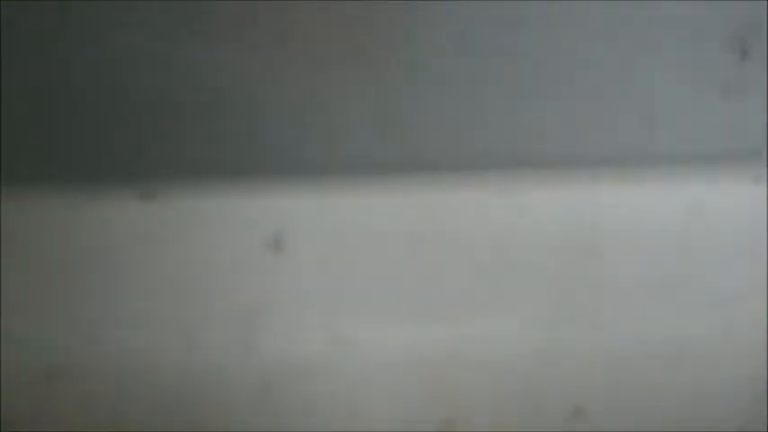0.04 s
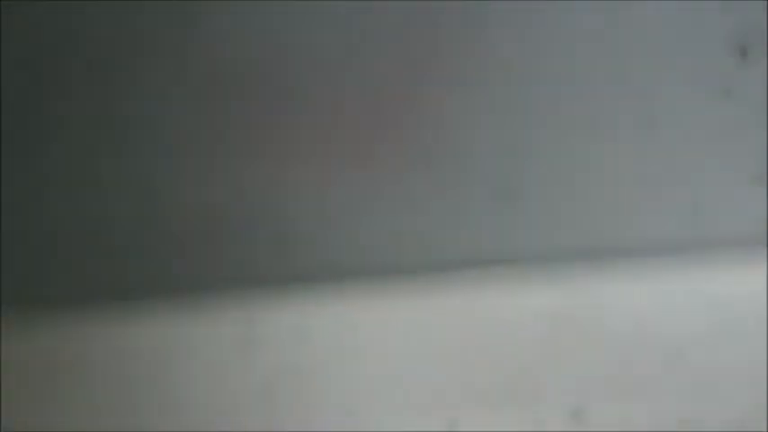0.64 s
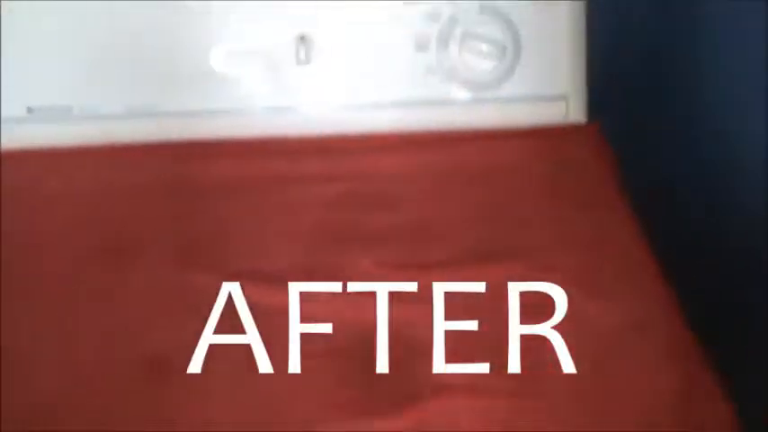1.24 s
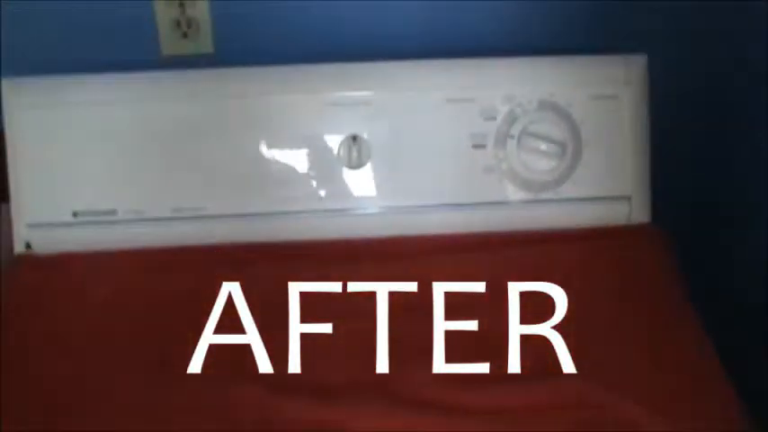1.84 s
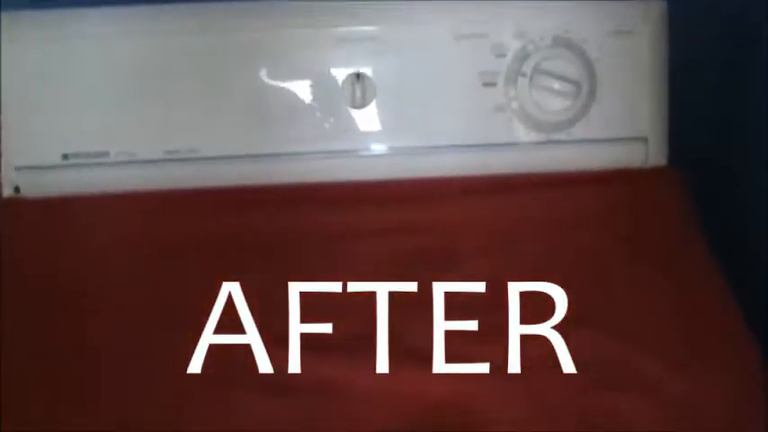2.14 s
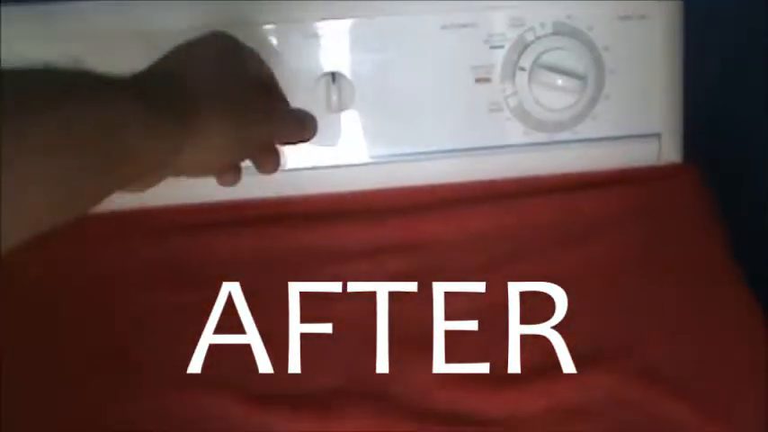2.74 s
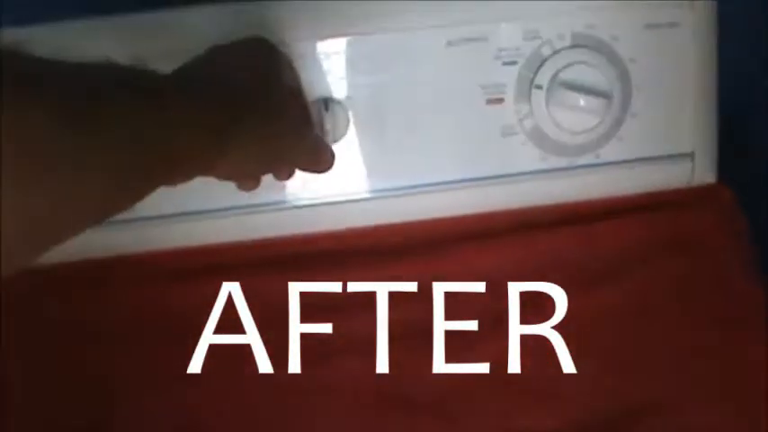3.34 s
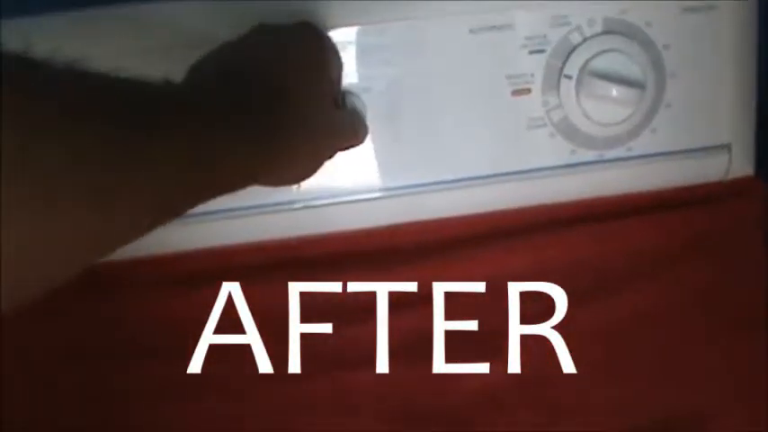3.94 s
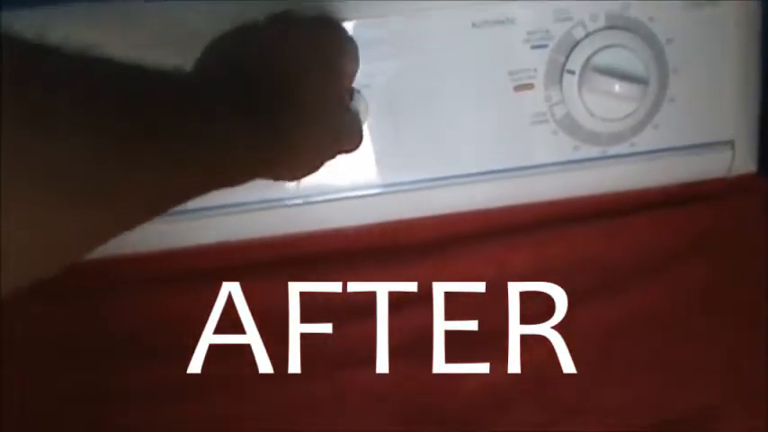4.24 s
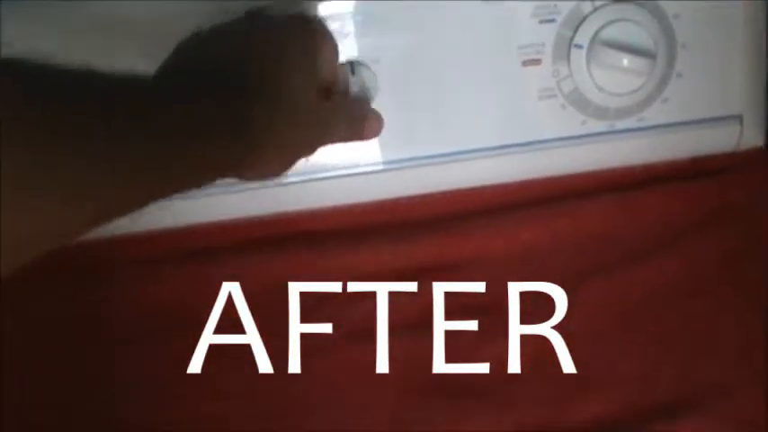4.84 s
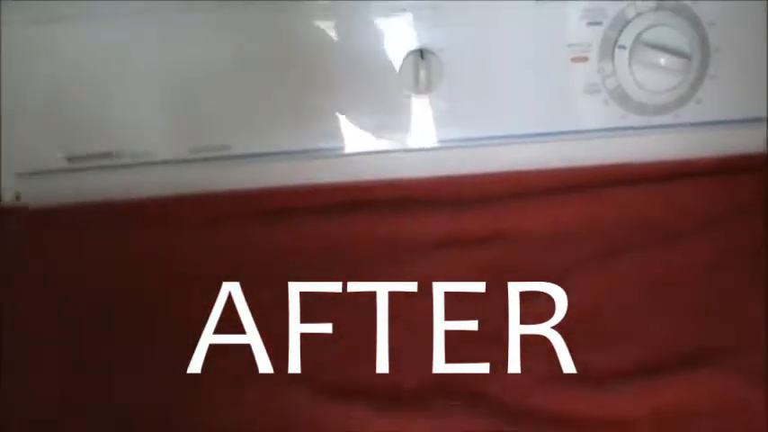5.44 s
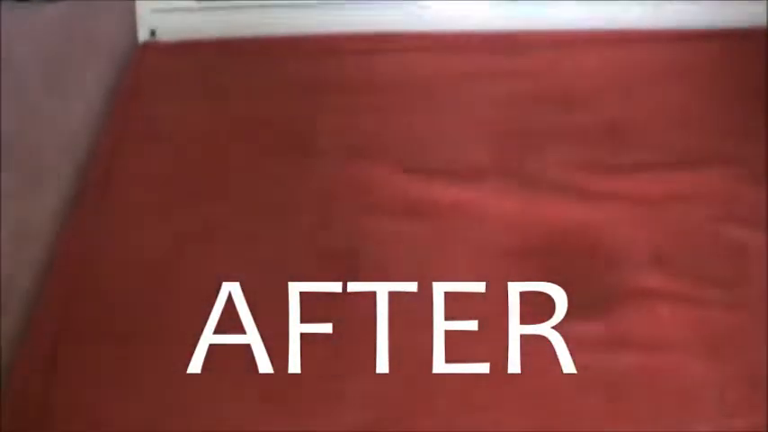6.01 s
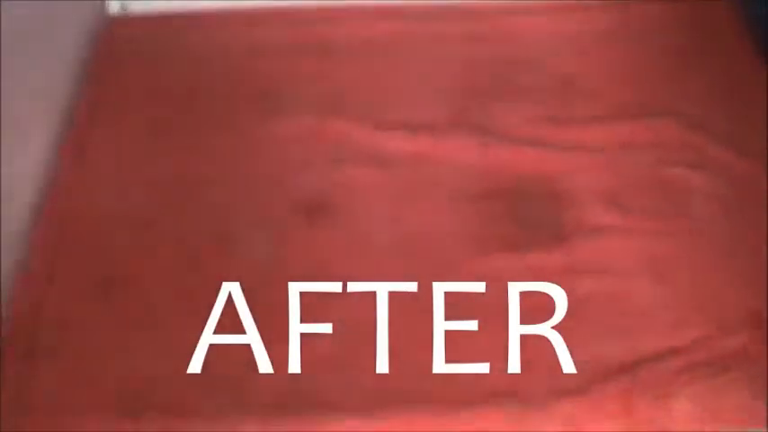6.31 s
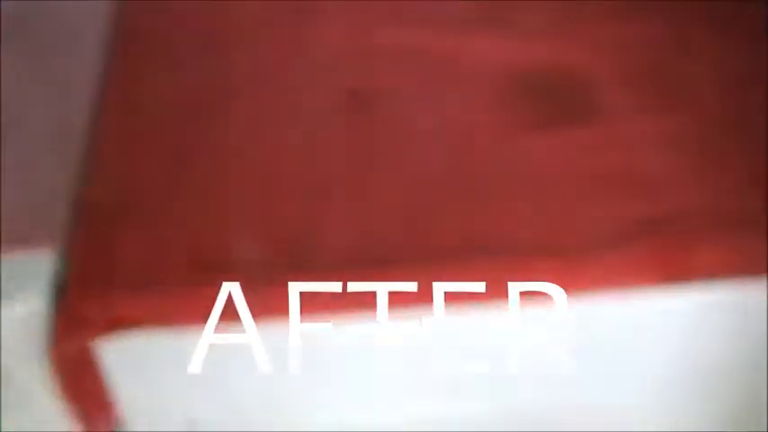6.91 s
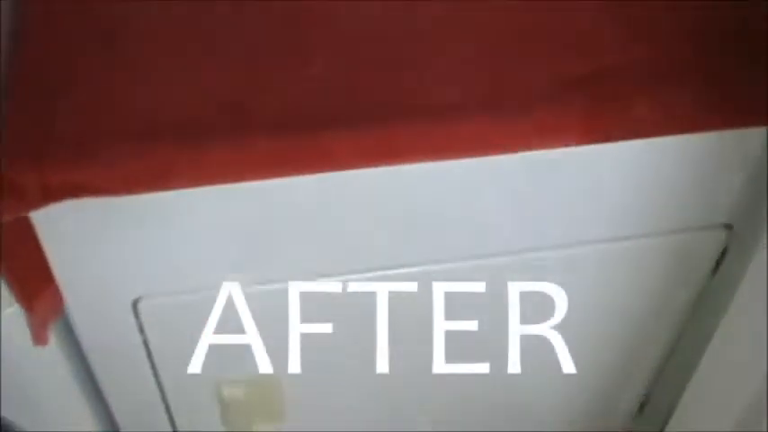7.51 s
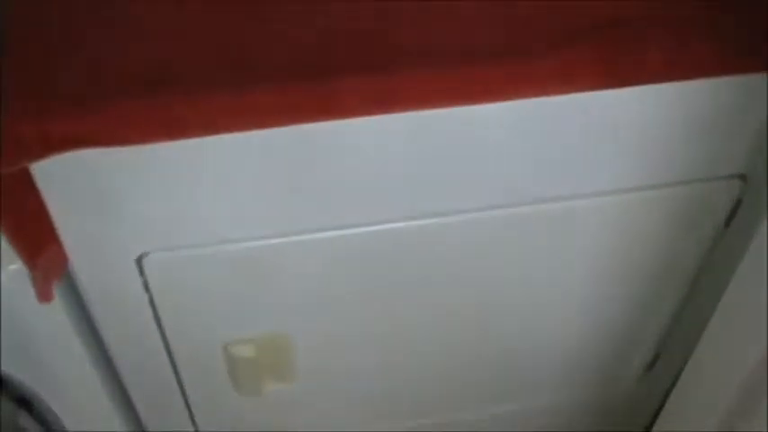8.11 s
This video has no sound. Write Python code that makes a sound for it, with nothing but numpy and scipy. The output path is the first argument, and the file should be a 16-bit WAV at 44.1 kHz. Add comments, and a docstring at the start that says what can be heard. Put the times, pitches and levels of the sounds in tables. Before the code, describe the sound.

A clothes dryer hums and gives one shrill squeal, goes quiet, then restarts with a sharp clack and runs smoothly.

```python
"""A clothes dryer hums while its dry drum bearing grips and slips in one shrill squeal, ducking the gain.
After a cut the machine stands still in a small room, with a faint buzz. A hand turns the start knob,
the motor runs up and its centrifugal switch clacks open. The drum then rumbles and swishes against
its felt seal under the mains hum and the tone of the blower's blades."""
import sys
import numpy as np
from scipy import signal
from scipy.fft import rfft, irfft, next_fast_len
from scipy.io import wavfile
from scipy.ndimage import uniform_filter1d

SR = 44100
rng = np.random.default_rng(int(sys.argv[2]) if len(sys.argv) > 2 else 0)


def int16_out(signal):
    """Quantize to a 16-bit WAV file."""
    q = np.round(np.clip(np.atleast_2d(signal).T, -1, 1) * 32767)
    wavfile.write(sys.argv[1], SR, q.astype(np.int16))


N = 360297
T = np.arange(N) / SR
CUT_S, START_S = 1.073, 4.24  # the first run is cut off; the second starts
MAINS_HUM_HZ = 119.8

# Air rushing through the drum. Each row: frequency in Hz, relative noise density in dB.
AIR = [(350, -41), (650, 4), (980, 1), (1400, 0.5), (2200, -3.5), (3000, -12), (4500, -16), (9000, -27)]
# Resonances of the steel drum. Each row: centre in Hz, width in Hz, boost in dB.
DRUM_MODES = [(2130, 60, 4), (3350, 110, 5), (4150, 40, 8.5), (4370, 70, 7), (6310, 45, 5), (7620, 70, 4),
              (8460, 55, 5)]
# Stereo image at the two microphone ports. Each row: frequency in Hz, likeness from 0 to 1,
# left phase lead in radians, left minus right in dB.
PORTS = [(60.35, 1, -0.1, 1.5), (130, 0.94, -0.02, -0.5), (292, 0.96, -0.5, -2), (626, 0.44, -0.8, -4),
         (1000, 0.5, 0.33, -3), (3490, 0.77, 0.7, -1.5), (7600, 0.5, 0.7, -0.5), (14030, 1, 0.4, 0)]


def squeal(full_force_db=-12, jitter=0.0045, flutter_db=2.5, skirt_db=-24, half_db=-30, hiss_db=-24.5):
    """Stick-slip on the bearing: overtones grow with force, and rasping adds half-order lines and hiss."""
    # The harmonics from the fundamental up, each a relative level in dB.
    partials = [-0.5, -14, -22.5, -30]
    # The rasp's hiss. Each row: frequency in Hz, relative noise density in dB.
    hiss_spectrum = [(900, -25), (1650, -1.5), (2400, -4.5), (5000, -3), (8000, 0), (11000, -3),
                     (14000, -6), (15500, -21)]
    hz, db, rasp = bearing()
    angle = 2 * np.pi * np.cumsum(hz * (1 + jitter * drift(260))) / SR
    force = amp(0.305 * np.minimum(db - full_force_db, 0))
    tone = np.zeros(N, complex)
    for k, partial_db in enumerate(partials):
        skirt = amp(skirt_db) * (k + 1) * (drift(500) + 1j * drift(500))  # friction noise hugs it
        strength = amp(partial_db + flutter_db * k ** 0.5 * drift(80)) * force ** k
        tone += strength * (1 + skirt) * np.exp(1j * (k + 1) * angle)
        half_order = np.exp(1j * ((k + 0.5) * angle + drift(120)))  # every other slip is weaker
        tone += amp(half_db - k) * rasp ** 2 * half_order
    voice = np.sqrt(2) * ports(tone, lead=0.52, pan_db=-2.2).real
    hiss = amp(hiss_db) * rasp * noise(hiss_spectrum)
    direct = amp(db) * (voice + hiss) * ramp(0.179, 0.065)
    return direct + amp(-3) * room(direct)


def bearing(grip_s=0.329, release_s=0.658, note_hz=3225, arch_hz=180, sing_db=-53, hold_db=-5):
    """Pitch, level and rasp of the dry bearing: it sings faintly, grips, holds and lets go."""
    arch = arch_hz * swell(T - 0.399, 0.048, 0.048)  # the pitch lifts while the pressure peaks
    hz = (note_hz + arch) * (1 + 0.0035 * drift(45))
    attack_db = np.maximum(hold_db - 1500 * np.maximum(grip_s - T, 0), sing_db)
    db = attack_db - 850 * np.clip(T - release_s, 0, 1)
    rasp = swell(T - 0.61, rise=0.15, fall=0.059)
    return hz, db, rasp


def drum(first_run, second_run, first_db=-32.5, rumble_db=-22.5, air_db=-29.5, swish_db=-36.5):
    """The turning drum rumbles, air rushes through it and its felt seal brushes in grainy swishes."""
    # The first run's noise, then the second run's rumble and seal swish.
    # Each row: frequency in Hz, relative noise density in dB.
    first_spectrum = [(20, -9), (55, -7.5), (85, -15.5), (150, -11), (205, -7.5), (275, 2.5), (350, -9),
                      (470, -13), (650, -11), (900, -18.5), (1350, -19.5), (2200, -27.5), (4500, -35),
                      (7300, -33), (10000, -38), (12500, -33.5), (16000, -45.5)]
    rumble_spectrum = [(18, -23), (33, -9), (58, -6), (80, -11.5), (135, -7.5), (175, 1), (210, -2),
                       (285, 3.5), (340, -4), (410, -7), (560, -9.5), (750, -19), (1300, -43.5)]
    swish_spectrum = [(1200, -7), (2600, 4.5), (3400, 1.5), (4400, -0.5), (5200, -0.5), (6500, 0),
                      (8500, 0.5), (9700, -6), (13000, -11.5), (16000, -37)]
    # How strongly the hiss reaches the moving microphone. Each row: time in seconds, gain in dB.
    nearness = [(4.3, -6.5), (4.8, -7), (5.05, -5), (5.6, -1.5), (6.2, 0), (7.1, 0), (7.6, 1.5),
                (8.17, 0.7)]
    # Heavier falls of the load. Each row: peak time in seconds, rumble level in dB.
    tumbles = [(6.33, -26), (6.9, -28), (7.18, -21)]
    near_db = curves(nearness)[0]
    falls = sum(amp(db) * swell(T - s, 0.036, 0.036) for s, db in tumbles)
    rumble = np.hypot(amp(rumble_db + 0.5 * near_db), falls)
    stirred_air = amp(1) * seal_rubs(lag_s=0.02)
    air = np.hypot(amp(air_db), stirred_air) * amp(near_db) * speed() ** 0.2
    brushing = seal_rubs() * amp(0.96 * drift(30))
    swish = np.hypot(amp(swish_db), brushing) * amp(near_db) * speed() ** 2.4
    shake = 1 + 0.037 * np.cos(np.pi * MAINS_HUM_HZ * T)  # the motor shakes the rubbing parts
    running = noise(rumble_spectrum) * rumble * amp(1.14 * drift(19))
    running += noise(AIR, ripple_db=1.45, modes=DRUM_MODES) * air * amp(0.71 * drift(40))
    felt = noise(swish_spectrum, ripple_db=2, modes=DRUM_MODES)
    running += felt * swish * amp(0.6 * drift(150)) * shake
    early = noise(first_spectrum, ripple_db=2.5) * amp(first_db + 0.87 * drift(29))
    return early * first_run + running * second_run


def seal_rubs(lag_s=0, turn_s=1.182, turn_start_s=5.0):
    """Strength of the felt seal's rubbing: the same high spots come round on every turn."""
    # Each row: seconds into the turn, relative level in dB, rise in seconds, fall in seconds.
    high_spots = [(.0, -31, 0.053, 0.043), (.23, -30, 0.011, 0.038), (.42, -32, .075, 0.058),
                  (.648, -27.5, 0.031, 0.057)]
    travel = np.cumsum(speed()) / SR  # seconds of turning at full speed
    travel -= np.interp(turn_start_s, T, travel)
    power = 0
    for s, db, rise, fall in high_spots:
        offset = (travel - lag_s - s + turn_s / 2) % turn_s - turn_s / 2
        power += (amp(db) * swell(offset, rise, fall)) ** 2
    return np.sqrt(power)


def hum(first_run, second_run):
    """Mains hum and shaft orders, each wavering as the drum's load shifts."""
    # Motor and cabinet tones. Each row: pitch in Hz, first-run level in dB,
    # second-run base level in dB, waver from 0 to 1.
    tones = [(29.8, -57, -43, 0.32), (119.8, -34.5, -29, 0.14), (149, -50, -37, 0.67),
             (182, -43.5, -42.5, .5), (239.8, -49, -28.5, 0.49), (268, -48.5, -31, 0.38),
             (347, -48.5, -38, 0.7), (1248, -54, -50, 0.48), (1404, -57, -48.5, 0.7),
             (1510, -65.5, -53.5, 0.83), (2130, -70, -71, 0.47)]
    # The hum's loudness: it surges as the motor starts, dips, swells and slowly eases.
    # Each row: time in seconds, gain in dB.
    hum_level = [(4.35, -0.5), (4.7, -3.5), (5.3, 1.5), (5.9, 1), (6.5, -1.2), (8.1, -3)]
    late_gain = second_run * ramp(START_S, 0.1) * amp(curves(hum_level)[0])
    out = np.zeros((2, N))
    for hz, early_db, late_db, waver in tones:
        sway = unit_rms(1 + waver * (drift(3.8) + 1j * drift(3.8)))
        tone = sway * np.exp(2j * np.pi * (hz * T + rng.random()))
        _, lead, pan_db = at_hz(PORTS, hz)
        out += ports(tone, lead, pan_db).real * (amp(early_db) * first_run + amp(late_db) * late_gain)
    return np.sqrt(2) * out


def blower(first_run, second_run, blade_hz=589.3, first_db=-34):
    """The blade tone climbs and grows with motor speed; standing waves move it from port to port."""
    # The tone at the moving microphone. Each row: time in seconds, level in dB, left minus right in dB.
    path = [(4.6, -24, -1), (5.53, -22.5, -2.5), (5.7, -25, -9), (5.88, -35.5, -1.5), (5.95, -29, 4),
            (6.16, -25.5, 5), (6.25, -30, 11.5), (6.73, -24.5, -2.0), (6.78, -19.5, -1.5),
            (8.09, -14, -0.5), (8.17, -15, 0.0)]
    level_db, pan_db = curves(path)
    angle = 2 * np.pi * np.cumsum(blade_hz * speed() * (1 + 0.0011 * drift(7))) / SR
    tone = np.sqrt(2) * np.exp(1j * angle) * amp(0.84 * drift(28))
    early = ports(tone * amp(first_db) * first_run, lead=-0.6, pan_db=-2.03)
    late = ports(tone * amp(level_db) * second_run * speed() ** 6, lead=-1.22, pan_db=pan_db)
    return (early + late).real


def speed():
    """The motor's share of full speed: steady in the first run, climbing as the second begins."""
    # Each row: time in seconds, share of full speed.
    climb = [(4.24, .1), (4.4, 0.75), (4.48, 0.79), (4.54, .94), (4.6, 1)]
    return np.where(T < CUT_S, 1, curves(climb)[0])


def run_up(peak_s=4.435, whirr_db=-34.5, scrape_db=-33):
    """The labouring motor whirrs and then scrapes, throbbing with the mains, until it nears full speed."""
    throb = 1 + 0.44 * np.cos(2 * np.pi * MAINS_HUM_HZ * T)
    whirr = noise(AIR, ripple_db=1, modes=DRUM_MODES)
    whirr *= amp(whirr_db) * swell(T - peak_s, rise=0.094, fall=0.017)
    scrape = noise([(900, -30), (1600, 5), (2300, 4), (3200, -16), (9000, -29)], ripple_db=3)
    scrape *= amp(scrape_db) * swell(T - peak_s, rise=0.023, fall=0.017)
    return (whirr + scrape) * throb * ramp(START_S, 0.046)


def start_switch(open_s=4.4935, hold_s=0.015, snap_db=-12, snap_t60=0.2, ring_db=-22, ring_t60=0.35):
    """The centrifugal switch snaps open and chatters briefly; its midrange rings on in the cabinet."""
    # The bright clack. Each row: frequency in Hz, relative noise density in dB.
    clack = [(500, -32), (1100, -17), (1600, 0.5), (2300, 1), (3000, 5.5), (4500, -2.5), (7000, -2),
             (10500, -3), (13000, -5.5), (16000, -7.5)]
    decay = -60 * np.maximum(T - open_s - hold_s, 0)
    snap = noise(clack, ripple_db=2.5) * amp(snap_db + decay / snap_t60 + 1.1 * drift(300))
    ring = noise([(1000, -29), (1600, -2), (3200, -2), (6000, -21)], ripple_db=4.5)
    ring *= amp(ring_db + decay / ring_t60)
    return (snap + ring) * ramp(open_s, 0.003)


def thumps():
    """Blows from the knob and the starting drum ring the sheet-metal cabinet."""
    # Each row: start in seconds, strength in dB, extra damping in dB per second.
    blows = [(3.466, -36.5, 15), (4.28, -27, 11), (4.385, -26.5, 14)]
    # The cabinet's modes. Each row: pitch in Hz, relative level in dB, seconds to fall by 60 dB.
    panels = [(64.4, -5, 1), (119, -6, 1), (187, -4, 0.48), (234.5, 1, 0.35), (294, 1, 0.42),
              (362, 1.5, 0.39), (444, -8, 0.21), (563, -6, 0.12), (700, -15, 0.2), (840, -14, 0.13),
              (1028, -6.5, 0.13)]
    out, t = np.zeros((2, N)), np.arange(SR // 2) / SR
    for s, db, damping in blows:
        ring = sum(amp(mode_db - 60 * t / t60) * np.sin(2 * np.pi * (hz * t + rng.random()))
                   for hz, mode_db, t60 in panels)
        add(out, s, amp(db - damping * t) * ring * np.minimum(t / 0.0054, 1))
    return out


def ticks():
    """Small hard contacts, each a short dying burst of noise around one pitch region."""
    # Each row: start in seconds, level in dB, seconds to fall by 60 dB, centre in Hz, width in octaves.
    contacts = [(.436, -29, .05, 1900, 0.59), (.494, -28, .04, 1900, .5), (.569, -16.5, 0.071, 3500, 2.5),
                (.724, -32, .025, 1900, 0.54), (0.7405, -12, 0.018, 2670, 0.94),
                (3.426, -45, 0.024, 6000, 1), (3.4577, -41.5, .11, 2970, 0.4), (4.242, -37, .2, 380, 0.9),
                (4.744, -33, .06, 4490, 0.78), (5.895, -18.5, 0.064, 5990, 0.56)]
    out, t = np.zeros((2, N)), np.arange(8192) / SR
    hz = np.fft.rfftfreq(len(t), 1 / SR)
    for s, db, t60, centre_hz, octaves in contacts:
        mid, side = rng.standard_normal((2, len(t)))
        colour = 1 / (1 + (np.log2((hz + 1) / centre_hz) / octaves) ** 4) ** 0.79
        burst = unit_rms(irfft(rfft([mid + 0.5 * side, mid - 0.5 * side]) * colour))
        add(out, s, burst * amp(db - 60 * t / t60) * np.minimum(t / 0.00089, 1))
    return out + amp(-17) * room(out)


def pulsing_buzz(rate_hz=30, level_db=-47.5, fade_out_s=0.062):
    """A fast train of faint ticks, each ringing the same few pitches, its level wandering slowly."""
    # When it buzzes. Each row: start in seconds, end in seconds, fade-in in seconds.
    spells = [(1.3, 3.45, 0.31), (3.86, 4.8, 0.11)]
    # Each tick's ring. Each row: pitch in Hz, relative level in dB, seconds to fall by 60 dB.
    modes = [(1884, -1.5, 0.04), (2410, -2.5, 0.017), (4730, -3.5, 0.019), (5830, -7, 0.019),
             (8430, -4, .015)]
    beats = np.diff(np.floor(T * rate_hz + 0.6), prepend=0) > 0
    gate = sum(ramp(start, fade) * (1 - ramp(end - fade_out_s, fade_out_s))
               for start, end, fade in spells)
    out, t = np.zeros(N), np.arange(2048) / SR
    for hz, db, t60 in modes:
        ring = amp(db - 60 * t / t60) * np.sin(2 * np.pi * hz * t) * np.minimum(t / 0.0025, 1)
        out += signal.oaconvolve(beats * gate * amp(level_db + 1.6 * drift(30)), ring)[:N]
    return out


def rustles():
    """Soft grainy rustles as the microphone is moved and the hand grips the knob."""
    # Each row: peak time in seconds, level in dB, rise and fall in seconds, centre in Hz,
    # width in octaves.
    touches = [(1.6, -60.5, 0.062, 0.11, 2440, 0.16), (3.41, -56.5, 0.068, .025, 4500, 1.3)]
    out = np.zeros((2, N))
    for s, db, rise, fall, centre_hz, octaves in touches:
        band = [(centre_hz * 2 ** (k * octaves), -6 * k ** 2) for k in range(-3, 4)]
        out += noise(band) * amp(db + 2.5 * drift(120)) * swell(T - s, rise, fall)
    return out


def room_tone(level_db=-50.5):
    """The low, steady hush of the still room."""
    # Each row: frequency in Hz, relative noise density in dB.
    hush = [(15, -24.5), (28, 1.5), (50, -5.5), (96, -11), (165, -6.5), (300, -1.5), (430, -4.5),
            (600, -14), (1200, -18), (1700, -18), (2450, -18), (3800, -23), (15800, -25)]
    # The still room's stereo image, with the same columns as PORTS.
    still_image = [(59.7, 0.83, -2, -0.5), (282, 0.99, 0.6, 0), (599, 0.5, -1.5, -0.5),
                   (1400, 0.58, -3.5, -0.5), (3400, 0.57, -2, 0), (5004, .1, -2, -0.5),
                   (12000, 0.7, -0.5, 0)]
    return noise(hush, ripple_db=1.5, image=still_image) * amp(level_db)


def room(x):
    """Dense reflections from near walls; the treble dies first."""
    # Each row: frequency in Hz, seconds to fall by 60 dB.
    reverb_times = [(200, 0.52), (3000, 0.29), (7000, 0.24), (15000, 0.14)]
    hz, t, bands = signal.stft(rng.standard_normal((2, SR // 2)), SR, nperseg=256)
    decay = amp(-60 * t / at_hz(reverb_times, hz)[0][:, None])
    tail = signal.istft(bands * decay, SR, nperseg=256)[1]
    return signal.fftconvolve(x, tail / np.linalg.norm(tail[0]), axes=1)[:, :N]


def noise(spectrum, ripple_db=0, modes=(), image=PORTS):
    """Stereo noise shaped by (Hz, dB) rows; ripple is many narrow resonances, modes the strong ones."""
    size = next_fast_len(N, True)
    hz = np.fft.rfftfreq(size, 1 / SR)
    left, other = rfft(rng.standard_normal((2, size)))
    likeness, lead, pan_db = at_hz(image, hz)
    likeness = np.clip(likeness, 0, 0.995)
    right = likeness * left + np.sqrt(1 - likeness ** 2) * other
    pair = ports(np.array([left, right]), lead, pan_db) / np.sqrt(1 + likeness * np.cos(lead))
    ripple = unit_rms(uniform_filter1d(rng.standard_normal(len(hz)), size=400))
    ripple *= np.minimum(hz / 1000, 1)  # smoother in the bass
    peaks_db = sum(db / (1 + (2 * (hz - centre) / width) ** 2) for centre, width, db in modes)
    x = irfft(pair * amp(at_hz(spectrum, hz)[0] + ripple_db * ripple + peaks_db), size)[:, :N]
    return x / x.mean(0).std()


def ports(tone, lead, pan_db):
    """Gives a complex tone a phase lead (radians) and level difference, left against right."""
    side = np.array([[0.5], [-0.5]])
    return tone * np.exp(1j * side * lead) * amp(side * pan_db)


def drift(rate):
    """A smooth random wander of rms one that changes about rate times a second."""
    t = np.linspace(0, T[-1], 4096)
    lowpass = np.exp(-(np.fft.rfftfreq(len(t), t[1]) / rate) ** 2)
    return np.interp(T, t, unit_rms(irfft(rfft(rng.standard_normal(len(t))) * lowpass)))


def swell(offset, rise, fall):
    """A smooth hump of height one at offset zero, with its own rise and fall in seconds."""
    return np.exp(-0.5 * (offset / np.where(offset < 0, rise, fall)) ** 2)


def ramp(s, length):
    """Rises from zero to one over length seconds, starting at s."""
    return np.clip((T - s) / length, 0, 1)


def curves(rows):
    """Joins timed rows by straight lines; one array a column."""
    s, *columns = np.transpose(rows)
    return [np.interp(T, s, c) for c in columns]


def at_hz(rows, hz):
    """Reads a table on a log-frequency axis; one array a column."""
    f, *columns = np.transpose(rows)
    return [np.interp(np.log(hz + 1), np.log(f + 1), c) for c in columns]


def amp(db):
    """Decibels to gain."""
    return 10 ** (np.asarray(db) / 20)


def unit_rms(x):
    """Scales to an rms of one."""
    return x / np.sqrt(np.mean(abs(x) ** 2) + 1e-20)


def add(mix, s, sound):
    """Mixes a sound in at s seconds."""
    part = mix[:, round(s * SR):][:, :sound.shape[-1]]
    part += sound[..., :part.shape[1]]


def scene():
    """The squealing run, the pause and the smooth run."""
    first_run, second_run = 1 - ramp(CUT_S - 0.004, 0.0026), ramp(START_S, 0.055)
    machine = drum(first_run, second_run) + hum(first_run, second_run) + blower(first_run, second_run)
    events = squeal() * first_run + ticks() + thumps() + run_up() + start_switch()
    return machine + events + room_tone() + rustles() + pulsing_buzz()


def record(dry, limit_db=-9.2, recovery_db_per_s=22, cutoff_hz=15850):
    """Gain control ducks loud sounds, recovers slowly and resets at the cut; a low-pass trims the top."""
    power = uniform_filter1d((dry ** 2).mean(0), size=500, origin=200)
    power_db = 10 * np.log10(abs(power) + 1e-12)
    recovery_db = T * recovery_db_per_s
    parts = np.split(power_db + recovery_db, [round(CUT_S * SR)])
    peak_db = np.concatenate([np.maximum.accumulate(part) for part in parts]) - recovery_db
    duck_db = uniform_filter1d(np.maximum(peak_db - limit_db, 0), size=300)
    held = np.clip(dry / amp(duck_db), -1, 1)
    lowpass = signal.firwin(511, cutoff_hz, window=("kaiser", 9), fs=SR)
    return signal.oaconvolve(held, lowpass[None], "same")


dry = scene()
out = record(dry)
int16_out(out)
```